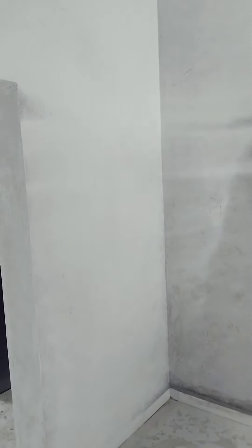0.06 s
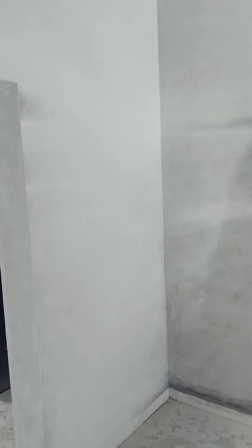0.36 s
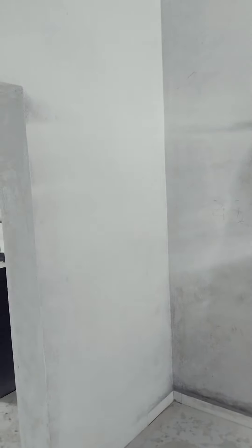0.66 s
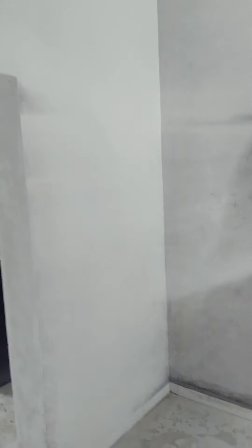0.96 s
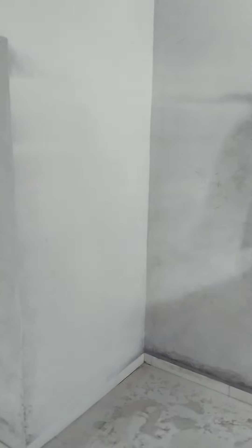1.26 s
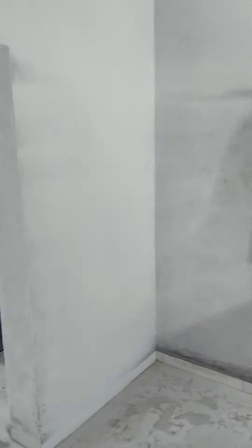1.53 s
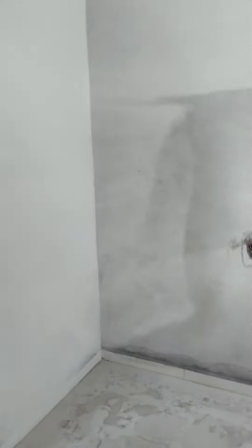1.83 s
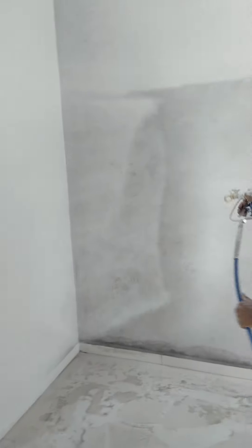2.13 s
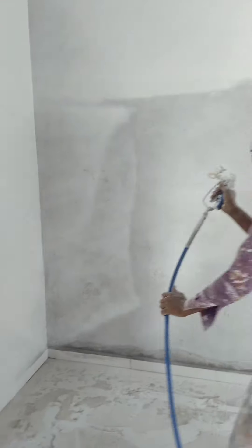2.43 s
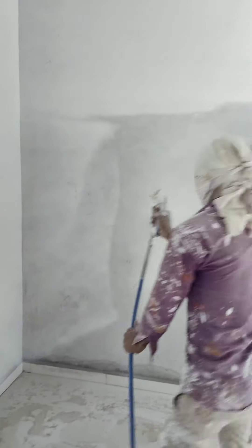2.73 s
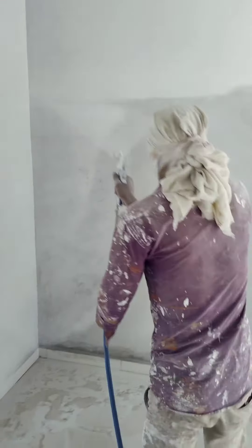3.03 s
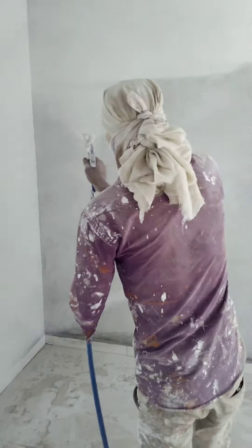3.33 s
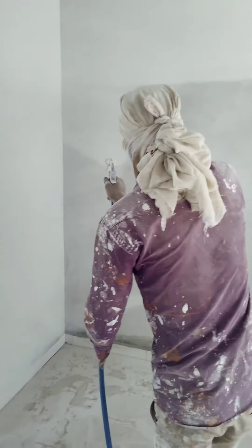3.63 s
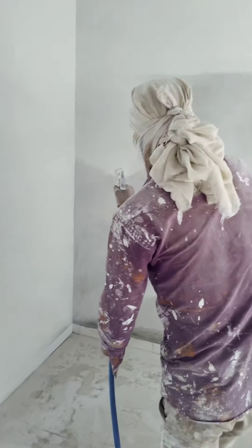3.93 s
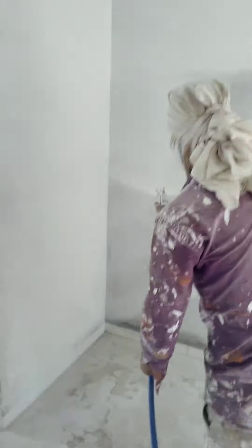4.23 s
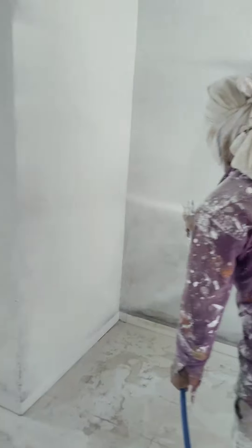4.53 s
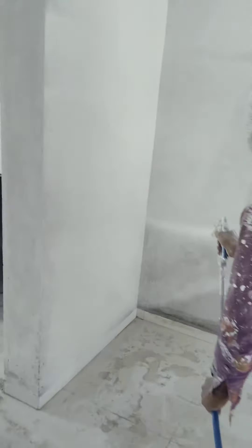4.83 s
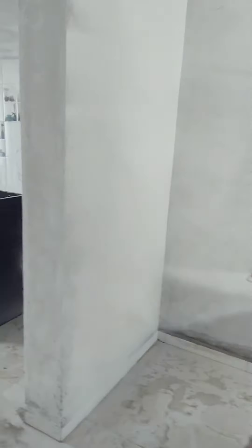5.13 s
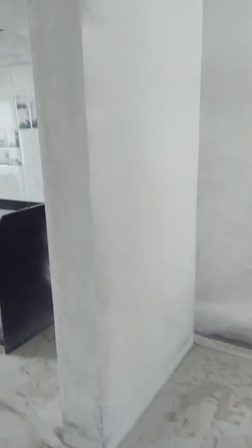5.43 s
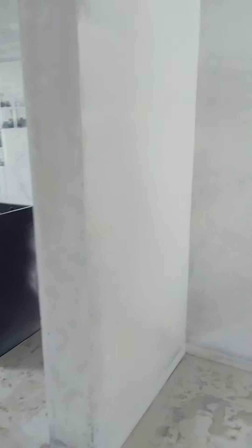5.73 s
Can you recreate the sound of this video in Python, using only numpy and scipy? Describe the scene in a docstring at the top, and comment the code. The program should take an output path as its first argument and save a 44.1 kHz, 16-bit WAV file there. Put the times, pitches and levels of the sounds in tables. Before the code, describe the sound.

A spray gun hisses loudly in an echoing room over a droning pump, stops for about a second, then starts again.

```python
"""A loud hiss fills a bare, echoing room: an airless gun sprays putty onto a wall, while its pump
drones and hums further off. The trigger is let go for a second: the valve knocks shut, the hiss dies
away, the pump eases, and shoes and hose scuff the gritty floor. Each microphone channel has its own
gain control, so the drone swells in the pause and ducks when the jet snaps on again."""
import sys
import numpy as np
from scipy import signal
from scipy.fft import rfft, irfft, next_fast_len
from scipy.io import wavfile
from scipy.ndimage import uniform_filter1d

SR = 44100
rng = np.random.default_rng(int(sys.argv[2]) if len(sys.argv) > 2 else 0)


def int16_out(signal):
    """Quantize to a 16-bit WAV file."""
    q = np.round(np.clip(np.atleast_2d(signal).T, -1, 1) * 32767)
    wavfile.write(sys.argv[1], SR, q.astype(np.int16))


N = 263277
SIZE = next_fast_len(N, True)
TIME = np.arange(SIZE) / SR
FREQS = np.maximum(np.fft.rfftfreq(SIZE, 1 / SR), 1)


def from_db(db):
    """Amplitude ratio: tenfold for every 20 dB."""
    return 10 ** (np.asarray(db) / 20)


def at_hz(points, hz):
    """Interpolation on a log-frequency axis."""
    frequencies, values = np.transpose(points)
    return np.interp(np.log(hz), np.log(frequencies), values)


def colour(spectrum):
    """Spectral envelope: a dB curve as a gain at every frequency."""
    return from_db(at_hz(spectrum, FREQS))


def ramp(start_s, length_s):
    """Linear rise from 0 to 1."""
    return np.clip((TIME - start_s) / length_s, 0, 1)


def white():
    """Spectrum of white noise with a density of 0 dB per Hz."""
    return rng.standard_normal(2 * len(FREQS)).view(complex) * np.sqrt(SIZE * SR) / 2


def drift(rate_hz):
    """Random modulation: low-passed noise with a standard deviation of 1."""
    wander = irfft(white() / (1 + (FREQS / rate_hz) ** 2), SIZE)
    return wander / wander.std()


# Likeness of the two channels for far sounds. Each row: frequency in Hz, coherence from 0 to 1.
COHERENCE = [(50, .35), (110, .86), (220, .9), (380, 0.88), (700, 0.48), (1300, 0)]
def diffuse(gain):
    """Diffuse field: the stereo spectrum of noise from all sides, coherent only at long wavelengths."""
    alike = np.clip(at_hz(COHERENCE, FREQS), 0, 1)
    mid = white() * gain * np.sqrt((1 + alike) / 2)
    side = white() * gain * np.sqrt((1 - alike) / 2)
    return np.array([mid + side, mid - side])


# Passes with the trigger held. Each row: start in seconds, end in seconds, jet strength in dB.
PASSES = [(-1.0, 1.745, -26.3), (2.871, 7.0, -26.8)]
# The jet and its spatter on the wall. Each row: frequency in Hz, relative density in dB per Hz.
JET_SPECTRUM = [(20, -88), (120, -51), (300, -45), (600, -37.5), (1000, -35), (1500, -31.5), (2000, -29),
                (2800, -24.5), (5000, -23), (8000, -23), (11500, -22.5), (13000, -24), (16000, -28.5)]
def jet(open_s=0.0024, close_s=0.048, swell_db=3.0, swell_s=.08, flutter_db=1.74, spatter_db=1.3):
    """Atomisation: putty tears apart at the nozzle in a hiss that flow and lumps modulate."""
    valve = 0
    for on, off, strength_db in PASSES:
        opening = ramp(on, open_s) * (1 - ramp(off, close_s))
        narrowing_db = swell_db * ramp(off - swell_s, swell_s)   # the jet swells as the valve narrows
        valve = valve + opening * from_db(strength_db + narrowing_db)
    flow = valve * from_db(flutter_db * drift(rate_hz=14) + spatter_db * drift(rate_hz=200))
    lag_s = [[0], [0.000507]]   # the direct sound reaches the right port later
    direct = 0.3 * white() * np.exp(-2j * np.pi * FREQS * lag_s)
    hiss = (diffuse(0.99) + direct) * colour(JET_SPECTRUM)
    return wall_echo(room(hiss, flow))


# The room's decay. Each row: band centre in Hz, reverberation time in seconds.
REVERB_TIMES = [(500, 1.18), (2500, 1.02), (5000, .8), (8000, .69), (11500, .46), (16000, 0.4)]
def room(spectrum, envelope, patchy_db=0.97):
    """Reverberation: noise swells with its source and lingers by band; the treble is absorbed first."""
    out = 0
    for centre, t60 in REVERB_TIMES:
        band_gain = at_hz([(hz, hz == centre) for hz, _ in REVERB_TIMES], FREQS)
        band = irfft(spectrum * band_gain, SIZE)
        drive = envelope * from_db(patchy_db * drift(rate_hz=5))
        # where the room stores little, more arrives early: each start is a bright spit
        out = out + band * linger(drive, t60, early_share=.28 / t60)
    return out


def linger(envelope, t60, early_share):
    """Exponential decay: some energy arrives at once; the room stores the rest, losing 60 dB per t60."""
    power = envelope ** 2
    retained = np.exp(-np.log(1e6) / (t60 * SR))
    stored = signal.lfilter([1 - retained], [1, -retained], power - power[0]) + power[0]
    early_share = np.clip(early_share, 0, 1)
    return np.sqrt(early_share * power + (1 - early_share) * np.maximum(stored, 0))


def wall_echo(hiss, reflection=0.35, delay_s=.0022, sway_s=.00035):
    """Comb filtering: the hiss interferes with its reflection; the dips slide as the hand sways."""
    echo = []
    for channel in hiss:
        emitted_s = TIME - delay_s - sway_s * drift(rate_hz=1.2)
        echo.append(np.take(channel, np.rint(emitted_s * SR).astype(int), mode="wrap"))
    return (hiss + reflection * np.array(echo)) / np.sqrt(1 + reflection ** 2)


# The pump's drone. Each row: frequency in Hz, density in dB per Hz before the load acts.
DRONE_SPECTRUM = [(20, -105), (60, -86), (110, -78.5), (170, -72.5), (240, -67.5), (340, -67), (500, -70),
                  (1000, -71), (1500, -78), (4000, -97.5)]
# The pump's wavering tones. Each row: frequency in Hz, rms level in dB before trim and load.
DRONE_TONES = [(101, -57), (121, -54), (146, -57), (189, -56), (217, -53), (245, -50), (281, -52.5),
               (326, -44.5), (393, -51.5), (661, -51)]
# The motor's cooling air. Each row: frequency in Hz, density in dB per Hz.
FAN_SPECTRUM = [(20, -103), (55, -80), (110, -80), (200, -80), (1000, -76.5), (1400, -74.5), (2000, -75),
                (3000, -75), (4500, -82.5), (6500, -91), (10000, -97), (16000, -103)]
def pump(width_hz=4.0, trim_db=-1.0):
    """Machine noise: a broad drone and narrow-band tones follow the load; the cooling air is steady."""
    tone_density = 0
    for hz, db in DRONE_TONES:
        peak = 1 / (1 + ((FREQS - hz) / width_hz) ** 2) ** 2
        tone_density = tone_density + from_db(db + trim_db) ** 2 * peak / (width_hz * np.pi / 2)
    drone = irfft(diffuse(np.sqrt(colour(DRONE_SPECTRUM) ** 2 + tone_density)), SIZE)
    cooling_air = irfft(diffuse(colour(FAN_SPECTRUM)), SIZE)
    return from_db(pump_load()) * drone + cooling_air


def pump_load(labour_db=2.0, labour_s=.5, ease_db_per_s=13.0, recover_db_per_s=8.5):
    """Back pressure: the pump labours against the shut valve, eases, then picks up as the jet runs."""
    load_db = -0.8   # while spraying steadily
    for shut, reopened in pauses():
        easing_s = np.maximum(np.minimum(TIME, reopened) - shut - labour_s, 0)
        paused_db = labour_db * ramp(shut, length_s=.1) - ease_db_per_s * easing_s
        recovery_s = abs(paused_db[-1]) / recover_db_per_s
        load_db = load_db + paused_db * (1 - ramp(reopened, recovery_s))
    return load_db


def pauses():
    """Gaps in the flow: the times in seconds at which the valve shuts and reopens."""
    return [(before[1], after[0]) for before, after in zip(PASSES, PASSES[1:])]


def hum(hz=101.0, base_db=-62, surge_db=11.5, waver_db=1.5, attack_s=.06, hold_s=.4, release_s=1.1):
    """Magnetostriction: the motor's iron hums at twice the mains rate, surging as pressure rebuilds."""
    surge = sum(ramp(reopened, attack_s) - ramp(reopened + hold_s, release_s)
                for _, reopened in pauses())
    level_db = base_db + surge_db * surge + waver_db * drift(rate_hz=12)
    return from_db(level_db) * np.sin(2 * np.pi * hz * TIME)


# Modes of gun and hose. Each row: frequency in Hz, relative peak in dB, 60 dB decay time in seconds.
GUN_MODES = [(92, -42, .25), (140, -39, .16), (292, -39, .03)]
def valve_knock(seating_s=.02, seating_db=3.0, lead_s=.004):
    """Impact excitation: the valve rings damped modes as it seats, and more softly as it opens."""
    out = 0
    for shut, reopened in pauses():
        for start, strength_db in [(shut + seating_s, seating_db), (reopened - lead_s, 0)]:
            for hz, db, t60 in GUN_MODES:
                age = np.clip(TIME - start, 0, 3 * t60)
                out = out + from_db(strength_db + db - 60 * age / t60) * np.sin(2 * np.pi * hz * age)
    return out * from_db([[2.0], [-2.0]])   # louder on the left


# Slides over the floor. Each row: peak time, rise and fall time constants, all in seconds,
# stroke gain in dB, added gain of the squeal in dB.
STROKES = [(2.26, .02, 0.032, -6, -5), (2.388, 0.018, .03, 3.5, -6), (2.42, .015, 0.056, -8, 7),
           (2.655, 0.052, 0.042, 2, 7.5), (2.73, .03, .05, -9, 8), (2.85, 0.022, .02, -2, -5)]
# Rubbing grit. Each row: frequency in Hz, relative density in dB per Hz.
RUB_SPECTRUM = [(500, -89), (2000, -77.5), (3400, -75), (5800, -83), (9000, -75), (11500, -78),
                (16000, -87)]
# The grit's thin squeal. Each row: frequency in Hz, relative density in dB per Hz.
SQUEAL_SPECTRUM = [(6600, -105), (7700, -76), (8400, -75), (9200, -82), (10800, -102)]
def scuffs(grit_db=2.5):
    """Sliding friction: each stroke of shoe or hose over grit swells and fades, with a squeal on top."""
    grit = from_db(grit_db * drift(rate_hz=300))
    rub, squeal = 0, 0
    for peak_s, rise, fall, level_db, squeal_db in STROKES:
        envelope = np.exp(-np.maximum((peak_s - TIME) / rise, (TIME - peak_s) / fall))
        stroke = from_db(level_db) * grit * envelope
        rub = rub + stroke
        squeal = squeal + stroke * from_db(squeal_db)
    rub_noise = irfft(diffuse(colour(RUB_SPECTRUM)), SIZE)
    squeal_noise = irfft(diffuse(colour(SQUEAL_SPECTRUM)), SIZE)
    return (rub_noise * linger(rub, t60=0.62, early_share=0.47)
            + squeal_noise * linger(squeal, t60=0.53, early_share=0.39))


# Microphone port cavities, left then right. Each row: centre in Hz, width in Hz, boost in dB.
PORT_RESONANCES = [(11300, 3000, 3), (8160, 3000, 7)]
# The right port faces the room and gets more treble. Each row: frequency in Hz, gain in dB.
RIGHT_TREBLE = [(100, -0.5), (1000, -0.2), (1500, 2.5), (2000, 7.5), (2700, 9), (4300, 6.5), (6000, 7),
                (11000, 8), (13000, 12), (14300, 13), (16000, 15.5)]
def ports(sound):
    """Cavity resonance: each microphone port lifts its own band of the treble."""
    response_db = np.array([db / (1 + (2 * (FREQS - hz) / width) ** 2)
                            for hz, width, db in PORT_RESONANCES])
    response_db[1] += at_hz(RIGHT_TREBLE, FREQS)
    return irfft(rfft(sound, SIZE) * from_db(response_db), SIZE)[:, :N]


def gain_control(sound, ceiling_db, window_s=0.0064, release_db_per_s=76):
    """Limiting: each channel is turned down at once above its ceiling and recovers at a steady pace."""
    width = int(window_s * SR)
    power = np.maximum(uniform_filter1d(sound ** 2, width), 1e-12)
    over_db = np.maximum(10 * np.log10(power) - ceiling_db, 0)
    released_db = release_db_per_s * np.arange(N) / SR
    held_db = np.maximum.accumulate(over_db + released_db, axis=1) - released_db
    return sound * from_db(-uniform_filter1d(held_db, width))


def scene():
    """Superposition: gun, feet and pump add up in one room."""
    return (jet() + scuffs() + valve_knock() + pump() + hum())[:, :N]


def record(dry):
    """Signal chain: port resonance, gain control, then a steep low-pass."""
    levelled = gain_control(ports(dry), ceiling_db=np.array([[-14.5], [-14.0]]))
    low_pass = signal.ellip(12, .1, 90, 15750, fs=SR, output="sos")
    return signal.sosfilt(low_pass, levelled)


dry = scene()
out = record(dry)
int16_out(out)
```